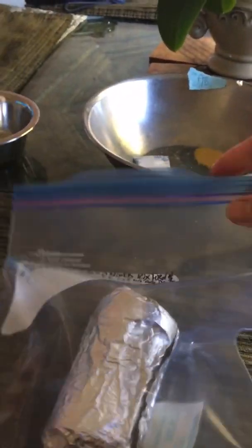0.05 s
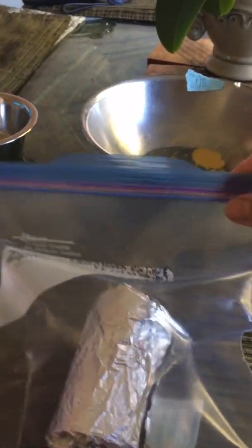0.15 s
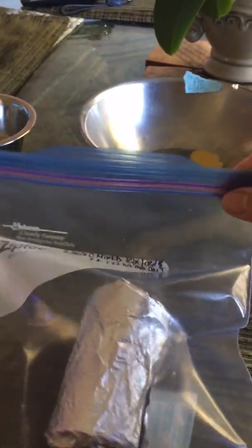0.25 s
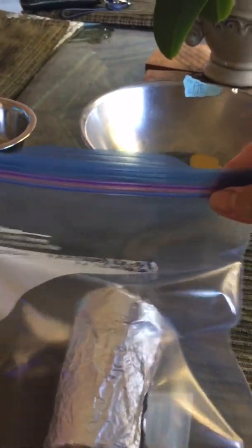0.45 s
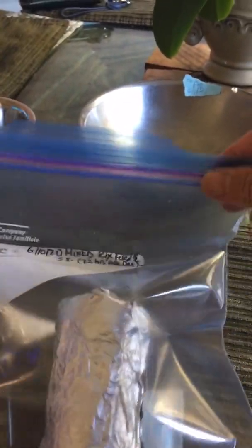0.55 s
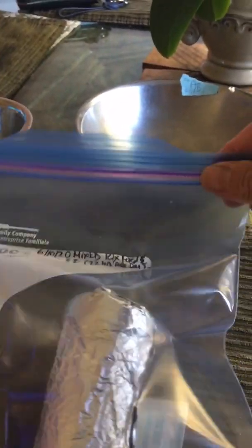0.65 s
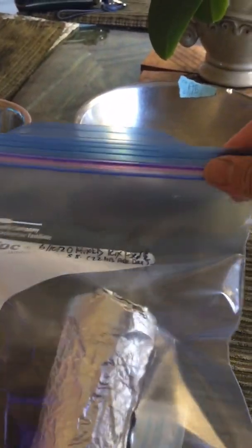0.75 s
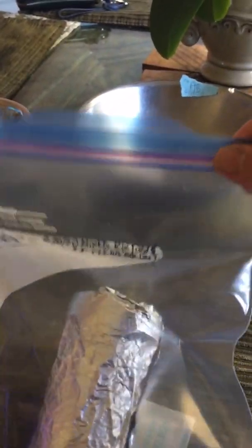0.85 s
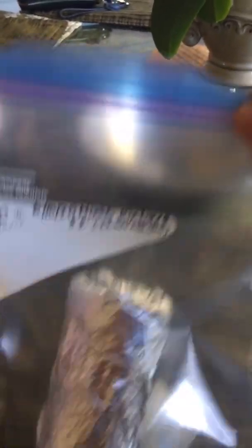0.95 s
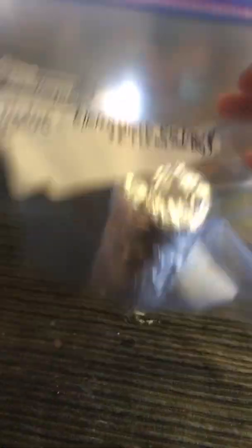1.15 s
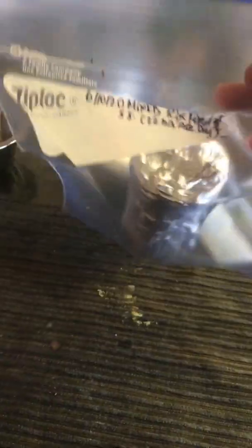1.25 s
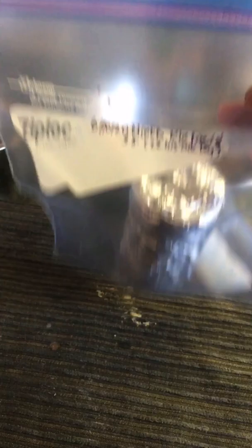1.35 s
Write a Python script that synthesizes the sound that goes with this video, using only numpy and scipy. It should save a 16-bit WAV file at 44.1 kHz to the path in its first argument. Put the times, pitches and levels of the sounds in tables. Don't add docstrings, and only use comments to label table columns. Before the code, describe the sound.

A plastic freezer bag crinkles softly in the fingers, its seal gives three loud, bright snaps in quick succession, then sparse ticks and pops lead to busier crinkling as it is lifted; close microphone, quiet humming room.

```python
import sys
import numpy as np
from scipy import signal
from scipy.io import wavfile

SR = 44100
rng = np.random.default_rng(int(sys.argv[2]) if len(sys.argv) > 2 else 0)


def bounce(signal):
    frames = np.transpose(np.atleast_2d(signal))
    limited = np.clip(frames, -1, 1)
    pcm = np.round(limited * 32767).astype(np.int16)
    wavfile.write(sys.argv[1], SR, pcm)


def nominal_scale(level):
    x = np.asarray(level, float) / 20
    return 10 ** x


N = 61739
CUTOFF_HZ, RUMBLE_CUT_HZ = 16500, 32

# frequency in Hz, density in dB per Hz.
AIR_SPECTRUM = [(15, -40), (25, -9), (146, -7.5), (259, -8.5), (457, -23), (706, -36), (1250, -35.5),
                (14800, -48), (16500, -64)]
AIR_DB, PATCHY_DB = -54.5, 0.5
HUM_HZ, HUM_WIDTH_HZ, HUM_DB, HUM_WAVER_DB = 77.38, 3, -58.5, 3

# time in seconds, crinkle level in dB, brightness in dB per octave.
HANDLING = [(0, -48, -3.5), (0.027, -43.5, -4), (0.067, -59, -3.5), (.108, -53, -2.5), (.14, -58, -4.5),
            (.48, -62, -4), (0.601, -63, -2.5), (.72, -64, -9), (0.848, -58, -2.5), (0.904, -41.5, -2.5),
            (0.929, -53.5, -1.5), (0.963, -45, -1.5), (0.998, -57, -1.5), (1.068, -61.5, -2),
            (1.079, -43, -8), (1.124, -50, -5), (1.201, -61.5, -2), (1.31, -56.5, -7.5)]
# frequency in Hz, gain in dB.
FILM_COLOUR = [(250, -17), (800, 1), (1500, 0), (3000, -1), (6000, -6), (9000, -6), (15000, -20)]
GRAINS_PER_S, GRAIN_SPREAD_DB, CLUMP_DB = 1500, 4.2, 4.5
GRAIN_CYCLES = 5.22
OWN_SHARE = .55

# start in seconds, length in seconds, level in dB,
# centre in Hz, width in Hz.
RUBS = [(0.0027, 0.059, -52, 1050, 580), (0.099, 0.022, -58.5, 7900, 9000), (0.49, 0.022, -53, 7100, 12500),
        (0.887, 0.039, -53, 740, 115), (.955, 0.019, -48.5, 8500, 8900), (1.071, 0.047, -49.5, 5600, 3100),
        (1.073, 0.046, -47, 1490, 930), (0.938, 0.0031, -44, 2800, 3600), (1.018, 0.031, -59.5, 2600, 7700),
        (0.58, 0.029, -74, 8860, 9000), (1.326, 0.0057, -50, 7000, 4000),
        (1.334, 0.014, -45.5, 5800, 18000), (1.349, 0.13, -55.5, 2500, 5800),
        (1.075, 0.057, -62, 13000, 6700), (0.931, 0.016, -50, 3000, 4000)]
RUB_EDGE_S, RUB_GRIT_DB = .004, 5

# start in seconds, level in dB.
CREASES = [(.1695, -35), (.4995, -32), (.5657, -37), (.7930, -39.5), (.9417, -29), (1.0969, -29),
           (1.1556, -32), (1.2706, -30), (1.3015, -41), (1.3402, -29), (1.3850, -33.5)]
# frequency in Hz, width in Hz, level in dB.
CREASE_MODES = [
    [(1590, 130, 0), (2700, 810, -4), (4190, 690, 0), (5480, 470, -6)],
    [(870, 90, 0), (1560, 160, -1), (2430, 260, -11), (3060, 290, -13), (3900, 330, -17)],
    [(1040, 130, 0), (2280, 250, -8), (3260, 450, -14)],
    [(1080, 100, 0), (1520, 360, -3), (2540, 210, -18)],
    [(970, 150, -3), (2150, 350, 0), (2710, 990, -11)],
    [(1180, 260, -5), (1570, 130, 0), (2530, 900, -20), (4280, 720, -18)],
    [(2240, 410, -5), (4090, 410, 0), (5760, 620, -4), (7820, 1660, -10)],
    [(880, 120, -14), (1410, 110, -2), (1720, 330, 0), (2570, 370, -2), (4310, 470, -12)],
    [(1110, 580, -5), (1700, 340, 0)],
    [(900, 160, 0), (2600, 220, -6), (4400, 600, -15)],
    [(570, 100, 0), (1010, 410, -4), (1850, 240, -8), (2540, 480, -11), (3300, 290, -15)],
]
# start in seconds, level in dB, frequency in Hz, width in Hz.
BLIPS = [(.004, -40, 820, 300), (.005, -46, 2000, 500), (.0225, -37, 1010, 200), (.029, -40, 1120, 250),
         (.0375, -41, 1080, 250), (.092, -47, 870, 250), (.8995, -36, 730, 200), (.9595, -38, 1190, 300),
         (1.028, -47, 800, 300), (1.0835, -35, 1620, 400), (1.092, -37, 1480, 400), (1.1155, -39, 620, 250),
         (1.1435, -40, 620, 250), (1.2305, -48, 2500, 700)]
CONTACT_HZ = 7000

# frequency in Hz, level in dB.
ECHO_COLOUR = [(400, -4.5), (1500, 1.5), (4000, -4), (9000, 0), (15000, 5.5)]
# frequency in Hz, time to fall 60 dB in seconds.
ECHO_T60 = [(400, .4), (2000, 0.24), (8000, 0.37), (15000, 0.12)]
ECHO_DB, FILM_SEND_DB, ECHO_GAP_S = -17, 2.5, .008
WALL_S, WALL_DB = .0081, -31.5

# start in seconds, level in dB, lowest mode in Hz, top in Hz,
# time to fall 60 dB in seconds.
TICKS = [(0.082, -55, 6500, 16000, .006), (.110, -41, 1800, 12000, .012), (.142, -54, 6000, 8000, .006),
         (0.1695, -45, 2320, 7500, .008), (.2445, -38, 2964, 14800, .005), (.385, -69, 1000, 2500, 0.016),
         (.501, -42, 840, 4250, 0.02), (0.567, -47, 1050, 4290, 0.035), (.631, -66, 2197, 4540, .01),
         (.734, -51, 1700, 2450, 0.015), (.7945, -49, 1500, 2600, 0.014), (0.837, -45, 850, 2470, 0.017),
         (.853, -43.5, 1920, 4000, 0.004)]
# start in seconds, level in dB, lowest mode in Hz, top in Hz,
# time to fall 60 dB in seconds.
LIFT_FLIPS = [(.872, -35, 1310, 7200, 0.0085), (.896, -33, 1320, 8000, 0.021),
              (.901, -53, 760, 8900, 0.017), (.907, -33.5, 1510, 4800, 0.021),
              (.913, -38, 1820, 9000, 0.0055), (0.975, -40, 1700, 9000, .008),
              (1.008, -43, 1800, 6500, 0.012), (1.1065, -37, 4300, 6500, 0.006),
              (.917, -37, 1190, 7500, 0.0053), (0.9418, -40, 2160, 4800, 0.019),
              (.960, -34.5, 1470, 14200, 0.0078), (1.03, -43.5, 810, 4000, 0.025),
              (1.083, -43, 1620, 6100, .012), (1.099, -35, 1530, 9050, 0.014),
              (1.115, -32, 1620, 4700, .015), (1.142, -38, 2300, 6000, 0.011),
              (1.156, -42, 2240, 13800, 0.0053), (1.2495, -48, 2360, 4820, 0.007),
              (1.2706, -41, 1460, 6500, 0.011), (1.3015, -52, 1120, 2500, 0.0106),
              (1.3323, -41, 4300, 7500, .006), (1.337, -44, 1820, 12100, 0.0081),
              (1.342, -40, 2600, 6500, 0.024), (1.386, -44, 825, 4020, 0.014)]
FILM_RATIOS = [1, 1.75, 2.7, 4.1, 6.3, 9.5, 14]
MODE_SCATTER, MODE_SCATTER_DB = .025, 1.5
FILM_CYCLES, FILM_TILT_DB, EDGE_DB = 4.6, -9, -26.5

SNAP_TIMES = [.20635, .23245, .24625]
# level in dB, rebound delay in seconds, rebound level in dB,
# rattle level in dB, level toward the room in dB.
SNAPS = [
    (-3.8, 0.00058, -11, -24, 1.5),
    (-6.5, .00023, -11, -22, -1.5),
    (-3.2, 0.00032, -11, -22.5, -3.5),
]
# frequency in Hz, width in Hz, level in dB.
RIB_MODES = [
    [(630, 130, -40), (2050, 400, -18), (2830, 550, -20), (4140, 750, -21), (5190, 1220, -16),
     (7630, 4600, -5), (9900, 1800, -5), (11310, 5270, 0), (13030, 3950, -5)],
    [(750, 160, -34), (1880, 690, -23), (2640, 480, -23), (3890, 800, -22), (6320, 1200, -7),
     (8530, 1650, 0), (11670, 2900, -3)],
    [(880, 220, -36), (1530, 280, -31), (4240, 770, -13), (5880, 1140, -8), (7240, 1580, 0),
     (8320, 2620, 0), (13810, 2500, -13)],
]
RATTLE_T60_S, THIN_HZ = 0.017, 550
CRACK_HZ, CRACK_T60_S = 8000, .0003

# start in seconds, level in dB, frequency in Hz,
# time to fall 60 dB in seconds.
BUMPS = [
    (.89, -41.5, 213, 0.098),
    (0.947, -40, 170, 0.042),
    (1.03, -38.5, 207, 0.017),
    (1.127, -36, 263, 0.022),
    (1.357, -36, 54, 0.05),
]


def rms_one(x):
    return x / np.sqrt(np.mean(x ** 2) + 1e-20)


def at_hz(points, hz):
    table = np.array(points)
    return np.interp(np.log(hz), np.log(table[:, 0]), table[:, 1])


def drift(rate):
    r = np.exp(-2 * np.pi * rate / SR)
    noise = rng.standard_normal(N + 9000)
    return rms_one(signal.lfilter([1], [1, -2 * r, r * r], noise)[9000:])


def ring(push, hz, t60):
    r = nominal_scale(-60 / (t60 * SR))
    w = 2 * np.pi * min(hz, SR / 2.2) / SR
    return signal.lfilter([0, np.sin(w)], [1, -2 * r * np.cos(w), r * r], push + 1e-18)


def thin(x, hz):
    return signal.sosfilt(signal.butter(3, hz, "high", fs=SR, output="sos"), x)


def add(out, s, x):
    i = int(s * SR)
    out[i:i + len(x)] += x[:N - i]


def bands(white):
    edges = 22 * 2 ** np.arange(0, 10, .5)
    result = []
    for k, (low, high) in enumerate(zip(edges, edges[1:])):
        sos = signal.butter(2, [low, high], "band", fs=SR, output="sos")
        result.append((np.sqrt(low * high), signal.sosfilt(sos, white[k % 2])))
    return result


def room_tone():
    white = rng.standard_normal((2, N + SR))
    air = sum(nominal_scale(at_hz(AIR_SPECTRUM, hz) + PATCHY_DB * drift(24)) * b[SR:] for hz, b in bands(white))
    hum_phase = 2 * np.pi * np.cumsum(HUM_HZ + HUM_WIDTH_HZ * drift(6)) / SR
    hum = nominal_scale(HUM_WAVER_DB * drift(12)) * np.sin(hum_phase)
    return nominal_scale(AIR_DB) * rms_one(air) + nominal_scale(HUM_DB) * rms_one(hum)


def grains(clumps):
    sizes = nominal_scale(GRAIN_SPREAD_DB * np.minimum(rng.exponential(1, N), 4)) * rng.choice([-1, 1], N)
    return rms_one(sizes * (rng.random(N) < GRAINS_PER_S * clumps / SR))


def crinkle():
    s, level_db, bright_db = np.transpose(HANDLING)
    t = np.arange(N) / SR
    level_db, bright_db = np.interp(t, s, level_db), np.interp(t, s, bright_db)
    clumps = nominal_scale(CLUMP_DB * drift(60))
    shared, out = grains(clumps), 0
    for hz in np.geomspace(250, 15000, 24):
        common = np.sqrt(1 - OWN_SHARE) * shared * rng.standard_normal(N)
        push = common + np.sqrt(OWN_SHARE) * grains(clumps)
        gain = nominal_scale(level_db + at_hz(FILM_COLOUR, hz) + bright_db * np.log2(hz / 1000))
        t60 = GRAIN_CYCLES / np.sqrt(1000 * hz)
        out = out + ring(push * gain, hz, t60) * (hz / 1000) ** 0.67
    return thin(out * 0.083, 200)


def rubs():
    out, t = np.zeros(N), np.arange(N) / SR
    for s, length_s, db, hz, width in RUBS:
        onset = (t - s) / RUB_EDGE_S
        release = 3.4 * (s + length_s - t) / length_s + 0.16
        shape = np.clip(np.minimum(onset, release), 0, 1)
        grit = rng.standard_normal(N) * nominal_scale(RUB_GRIT_DB * drift(250))
        body = ring(ring(grit, hz, 2.0 / width), hz, 2.0 / width)
        out += nominal_scale(db) * shape * rms_one(thin(body, hz / 2))
    return out


def creases():
    out, click = np.zeros(N), 1. * (np.arange(2500) == 0)
    push = signal.sosfilt(signal.butter(2, CONTACT_HZ, fs=SR, output="sos"), click)
    pops = [(s, db, modes) for (s, db), modes in zip(CREASES, CREASE_MODES)]
    blips = [(s, db, [(hz, width, 0)]) for s, db, hz, width in BLIPS]
    for s, db, modes in pops + blips:
        body = sum(nominal_scale(d) * width * ring(push, hz, 2.2 / width) for hz, width, d in modes)
        body = thin(body, modes[0][0] / 2)
        add(out, s, nominal_scale(db) * body / np.abs(body).max())
    return out


def room_echo(x):
    t = np.arange(SR // 2) / SR
    white = rng.standard_normal((2, len(t)))
    echo = sum(nominal_scale(at_hz(ECHO_COLOUR, hz) - 60 * t / at_hz(ECHO_T60, hz)) * b for hz, b in bands(white))
    echo = echo * np.clip(t / ECHO_GAP_S, 0, 1) ** 8
    echo = nominal_scale(ECHO_DB) * echo / np.sqrt(np.sum(echo ** 2))
    echo[int(WALL_S * SR)] += nominal_scale(WALL_DB)
    return signal.fftconvolve(x, echo)[:N]


def ticks():
    out, t = np.zeros(N), np.arange(3000) / SR
    for s, db, low_hz, top_hz, t60 in TICKS + LIFT_FLIPS:
        push = nominal_scale(-60 * t / t60) * rng.standard_normal(len(t)) ** 3 * 0.041
        push[0] += 1
        body = np.zeros(len(t))
        scatter = rng.standard_normal((2, len(FILM_RATIOS)))
        for m, level_draw, pitch_draw in zip(FILM_RATIOS, *scatter):
            if low_hz * m < CUTOFF_HZ:
                gain = nominal_scale(FILM_TILT_DB * np.log2(m) + MODE_SCATTER_DB * level_draw) * np.sqrt(m)
                hz = low_hz * m * (1 + MODE_SCATTER * pitch_draw)
                body += gain * ring(push, hz, FILM_CYCLES / (low_hz * np.sqrt(m)))
        body = thin(body, low_hz * .8)
        soft = signal.butter(3, min(top_hz, CUTOFF_HZ), fs=SR, output="sos")
        body = signal.sosfilt(soft, body) + nominal_scale(EDGE_DB) * body
        add(out, s, nominal_scale(db) * body / np.abs(body).max())
    return out


def snaps():
    near, far, t = np.zeros(N), np.zeros(N), np.arange(2000) / SR
    for s, (db, rebound_s, rebound_db, rattle_db, far_db), ribs in zip(SNAP_TIMES, SNAPS, RIB_MODES):
        push, body = np.zeros(len(t)), np.zeros(len(t))
        push[[0, int(rebound_s * SR), int(2 * rebound_s * SR)]] = nominal_scale(rebound_db * np.arange(3))
        for k, (hz, width, d) in enumerate(ribs):
            body += (-1) ** k * nominal_scale(d) * ring(push, hz, 2.2 / max(width, hz / 5.5))
        rattle = ring(rng.standard_normal(len(t)), 9000, .00025)
        rattle = nominal_scale(rattle_db - 60 * t / RATTLE_T60_S) * rattle
        add(near, s, nominal_scale(db) * (body / np.abs(body).max() + rattle))
        add(far, s, nominal_scale(far_db) * ring(1. * (t == 0), CRACK_HZ, CRACK_T60_S))
    return thin(near, THIN_HZ), thin(far, THIN_HZ)


def bumps():
    out = np.zeros(N)
    push = np.concatenate([np.hanning(60), np.zeros(9000)])
    for s, db, hz, t60 in BUMPS:
        body = ring(push, hz, t60)
        add(out, s, nominal_scale(db) * body / np.abs(body).max())
    return out


def scene():
    film = crinkle() + rubs() + creases() + ticks()
    near, far = snaps()
    echo = room_echo(far + nominal_scale(FILM_SEND_DB) * film)
    low = thin(bumps() + room_tone(), RUMBLE_CUT_HZ)
    return (near + film + echo + low)[None]


def top_cut(x):
    return signal.sosfilt(signal.butter(12, 16970, fs=SR, output="sos"), x)


def record(dry):
    low_pass = signal.cheby2(10, 60, CUTOFF_HZ + 600, fs=SR, output="sos")
    mix = signal.sosfilt(low_pass, dry)
    return top_cut(mix)


dry = scene()
out = record(dry)
bounce(out)
```